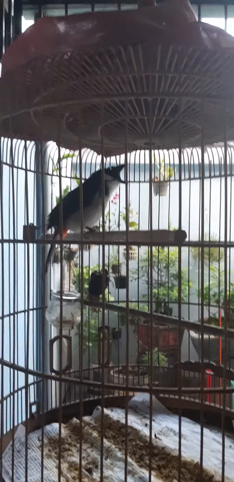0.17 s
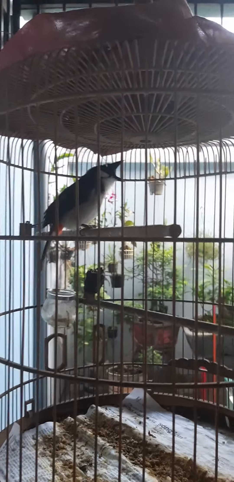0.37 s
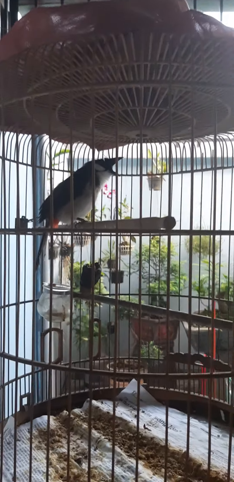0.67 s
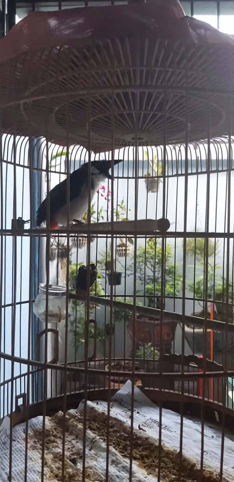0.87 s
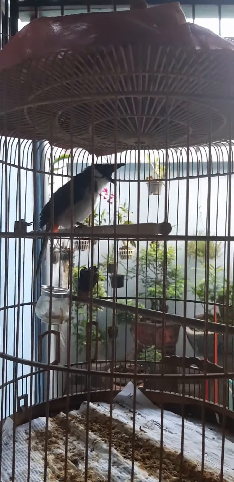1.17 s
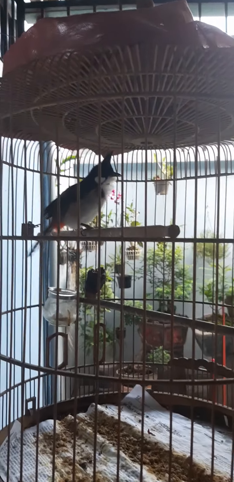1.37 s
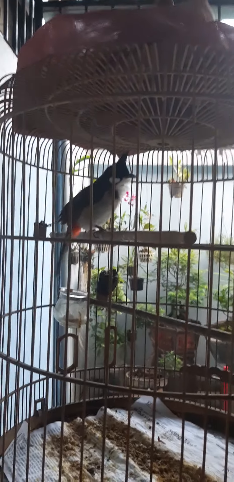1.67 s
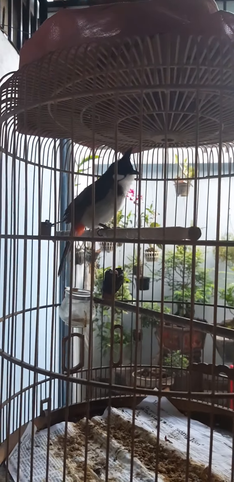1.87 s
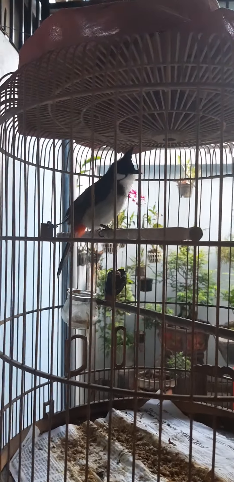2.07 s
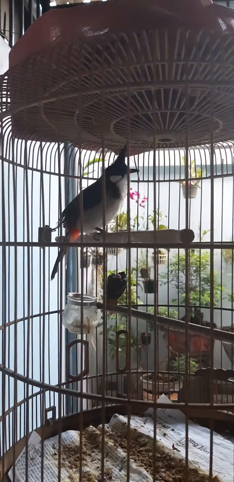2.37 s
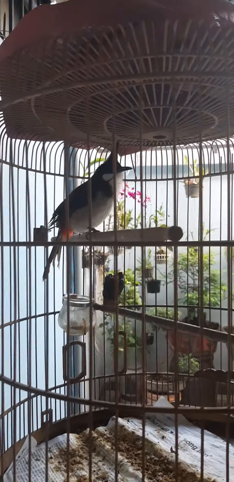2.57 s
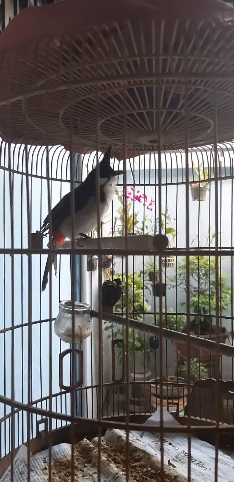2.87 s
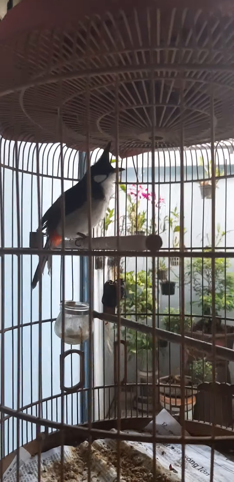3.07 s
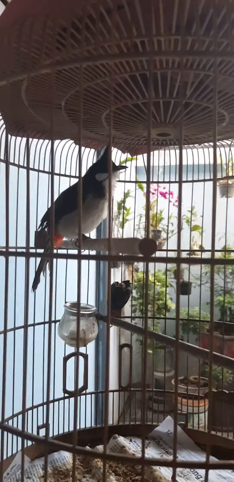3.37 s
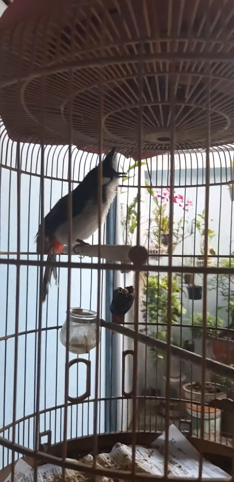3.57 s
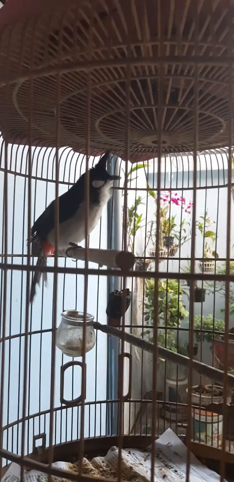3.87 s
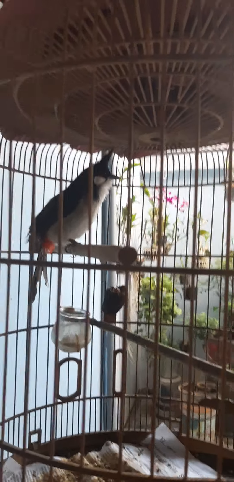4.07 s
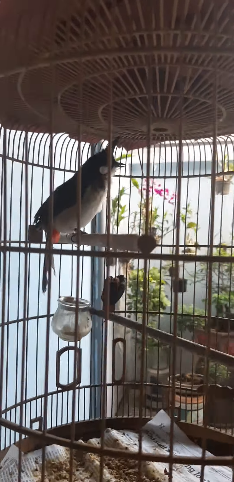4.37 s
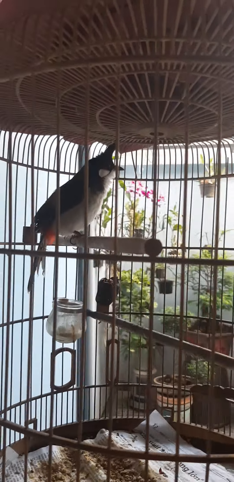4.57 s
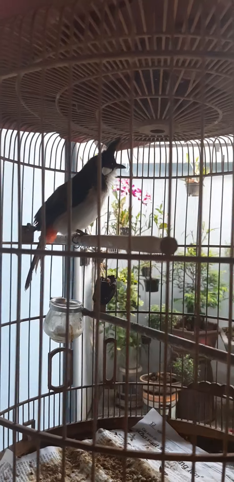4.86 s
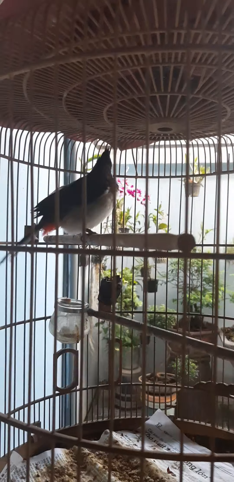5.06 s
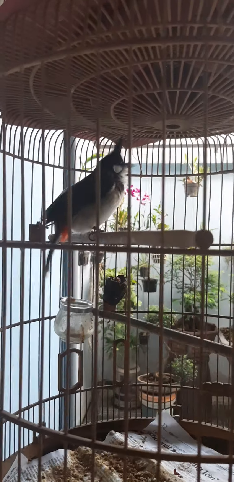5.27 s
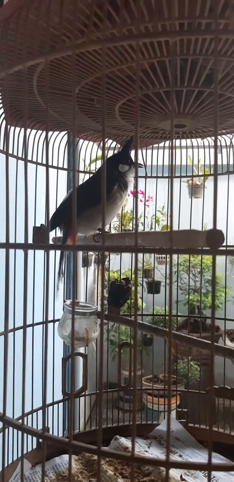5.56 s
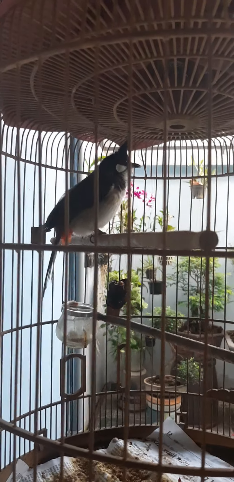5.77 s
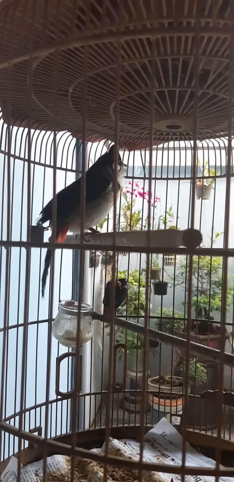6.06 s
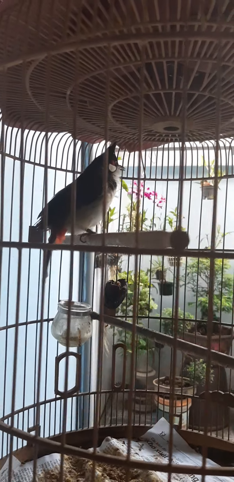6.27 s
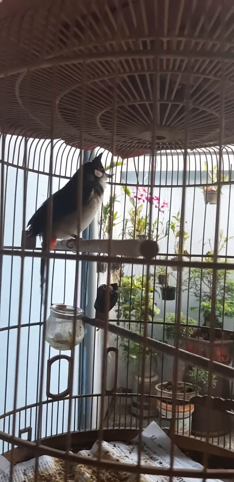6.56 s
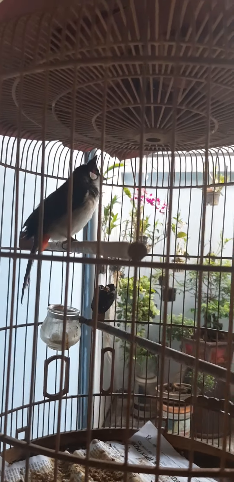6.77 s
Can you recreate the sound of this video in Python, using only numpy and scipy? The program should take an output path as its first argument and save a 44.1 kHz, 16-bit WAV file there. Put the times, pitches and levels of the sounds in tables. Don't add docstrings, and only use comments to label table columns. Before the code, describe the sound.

Close crested bird sings quick chip-and-warble phrases, ending in a run of bright whistles, with soft cage rustles and distant town rumble behind.

```python
import sys
import numpy as np
from scipy import signal
from scipy.fft import rfft, irfft, next_fast_len
from scipy.io import wavfile
from scipy.ndimage import uniform_filter1d, map_coordinates

SR = 44100
rng = np.random.default_rng(int(sys.argv[2]) if len(sys.argv) > 2 else 0)


def field_ratio(decibels):
    return 10 ** (np.asarray(decibels, dtype=float) / 20)


def store_wav(level_fs):
    pcm = np.round(np.clip(np.atleast_2d(level_fs), -1, 1) * 32767)
    wavfile.write(sys.argv[1], SR, pcm.T.astype(np.int16))


N = 305613
TIME = np.arange(N) / SR


def unit(x):
    return x / np.sqrt(np.mean(x ** 2) + 1e-20)


def along(points, hz):
    f, v = np.transpose(points)
    return np.interp(np.log(hz + 1), np.log(f + 1), v)


def level_over_time(points, outside_db=None):
    return np.interp(TIME, *np.transpose(points), left=outside_db, right=outside_db)


def wobble(rate):
    return map_coordinates(rng.standard_normal(N // 20), [TIME * rate])


def filtered(x, response):
    m = next_fast_len(N + 8192)
    return irfft(rfft(x, m) * response(np.fft.rfftfreq(m, 1 / SR)), m)[..., :N]


def swell(start, length, rise, fall):
    u = TIME - start
    return np.clip(u / rise, 0, 1) * np.exp(-np.clip(u - length, 0, None) / fall)


# frequency in Hz, likeness from -1 to 1.
PORT_LIKENESS = [(60, 1), (130, 0.98), (290, 0.89), (640, 0.61), (1400, 0.087), (3000, 0.15),
                 (15000, -0.11)]


def ports(pair, gain):
    turn = lambda hz: np.arccos(np.clip(along(PORT_LIKENESS, hz), -1, 1)) / 2
    mid, side = filtered(pair, lambda hz: gain(hz) * [np.cos(turn(hz)), np.sin(turn(hz))])
    return np.array([mid + side, mid - side])


def diffuse(gain):
    return unit(ports(rng.standard_normal((2, N)), gain))


# frequency in Hz, level in dB per Hz.
TRAFFIC_COLOUR = [(24, -37), (40, -30), (64, -19), (92, -7), (169, -4.5), (330, -4.5), (389, -9),
                  (429, -10.5), (1260, -18), (2000, -41), (2600, -83), (4400, -120)]
# time in seconds, level in dB.
TRAFFIC_SWELL = [(0, -55), (2.5, -52), (3.6, -54), (4.6, -54), (5.3, -54), (6.5, -54.5), (6.93, -55.5)]


def traffic():
    level_db = level_over_time(TRAFFIC_SWELL) + 1.5 + 1.2 * wobble(3) + .6 * wobble(10)
    return field_ratio(level_db) * diffuse(lambda f: field_ratio(along(TRAFFIC_COLOUR, f)))


# frequency in Hz, width in Hz, level in dB.
MOTOR_TONES = [(50.7, 11, -70), (101.4, 18.5, -54.5), (132.6, 7.1, -62), (436.7, 6.1, -63.5),
               (558, 21, -70.5), (1110, 12, -70.5)]


def motor_hum():
    return sum(field_ratio(db) * diffuse(lambda f: 1 / (1 + ((f - hz) / width * 2) ** 4))
               for hz, width, db in MOTOR_TONES)


# frequency in Hz, level in dB per Hz.
LEAF_COLOUR = [(700, -54), (1500, 10.5), (3000, 3.5), (4300, 1), (5600, -3.5), (7800, -1.5), (9300, -7),
               (12000, -3), (14500, -8.5), (15700, -26.5)]
# time in seconds, level in dB.
BREEZE = [(0, -57), (1.6, -58), (2.4, -57.5), (3.1, -61), (4.7, -61.5), (5.6, -53.5), (6.93, -64)]


def leaves():
    level_db = level_over_time(BREEZE) + 0.9 * wobble(20)
    return field_ratio(level_db) * diffuse(lambda f: field_ratio(along(LEAF_COLOUR, f)))


# time in seconds, level in dB.
HORN_LEVEL = [(4.5, -80), (4.62, -63), (4.86, -77), (4.88, -60.5), (5.17, -59), (5.24, -59.5), (5.4, -80)]
# multiple of the base pitch, level in dB.
HORN_OVERTONES = [(1, -7), (6, -9.5), (7, 3), (8, -3), (9, -10), (10, -15.5)]


def horn(hz=432):
    level = field_ratio(level_over_time(HORN_LEVEL, outside_db=-120))
    return level * sum(field_ratio(db) * diffuse(lambda f: 1 / (1 + ((f - k * hz) / 16) ** 2))
                       for k, db in HORN_OVERTONES)


# frequency in Hz, width in Hz, level in dB.
METAL_RINGS = [(1025, 130, -3), (1720, 490, -6.5), (2610, 54, -4), (3150, 48, -8.5), (3206, 22, 0.5),
               (4070, 55, -8.5)]
# time in seconds, level in dB.
SCRAPE_LEVEL = [(2.47, -82), (2.51, -51.5), (2.65, -48.5), (2.76, -54.5), (2.86, -57)]


def scrape():
    level = field_ratio(level_over_time(SCRAPE_LEVEL, outside_db=-120))
    ringing = lambda f: sum(field_ratio(db) / (1 + ((f - hz) / width * 2) ** 2) for hz, width, db in METAL_RINGS)
    return level * diffuse(ringing)


# start in seconds, length in seconds, level in dB.
CRICKET_PIPES = [(-.1, 0.2, -55), (0.394, 0.24, -51), (0.984, 0.27, -58), (1.573, 0.19, -64),
                 (2.176, 0.15, -57), (2.767, 0.096, -62), (3.388, 0.12, -65)]


def cricket(hz=3920, flutter_db=2, width=35):
    gate = sum(field_ratio(db) * swell(s, length, rise=0.029, fall=0.062) for s, length, db in CRICKET_PIPES)
    return gate * field_ratio(flutter_db * wobble(50)) * diffuse(lambda f: 1 / (1 + ((f - hz) / width) ** 2))


# start in seconds, length in seconds, level in dB, centre in Hz.
RUSTLES = [
    (0.273, 0.56, -60, 6870),
    (2.034, .1, -60, 12130),
    (2.505, 0.48, -55, 2700),
    (3.258, 0.033, -64, 7000),
    (3.766, 0.5, -59.5, 7060),
    (4.76, 0.18, -55.5, 3100),
    (4.95, 0.047, -59, 7060),
]


def feathers(octaves=1.42):
    out = np.zeros((2, N))
    for s, length, db, hz in RUSTLES:
        brush = diffuse(lambda f: np.exp(-(np.log2((f + 1) / hz) / octaves) ** 2))
        out += field_ratio(db + 1.5 * wobble(90)) * swell(s, length * .4, rise=.008, fall=length * .5) * brush
    return out


# start in seconds, level in dB, pitch in Hz.
PERCH_KNOCKS = [
    (4.779, -36, 236),
    (4.889, -61, 200),
]


def perch():
    return sum(field_ratio(db) * swell(s, 0, rise=0.00052, fall=0.0055) * np.sin(2 * np.pi * hz * (s - TIME))
               for s, db, hz in PERCH_KNOCKS)


# start in seconds, pitch in Hz, level in dB, time to fall 60 dB in seconds.
WIRE_TICKS = [
    (.54, 13600, -50, 0.27),
    (2.042, 12800, -53, .3),
    (4.78, 12900, -56, .2),
    (4.799, 8640, -57, 0.38),
]


def cage_wires():
    return sum(field_ratio(db) * swell(s, 0, rise=.001, fall=t60 / np.log(1000))
               * np.sin(2 * np.pi * hz * TIME + [[0], [2]]) for s, hz, db, t60 in WIRE_TICKS)


# frequency in Hz, level in dB.
THROAT_COLOUR = [(800, -4.5), (1250, -9.5), (1700, -5.5), (2300, -6), (2900, -2.5), (3700, -9), (5400, -25),
                 (6500, -25), (8000, -10), (9500, -41.5), (11200, -8), (13300, -11.5), (15500, -25)]
# frequency in Hz, level in dB per Hz.
BREATH_COLOUR = [(1000, -62), (3000, -10), (6000, 6.5), (8000, -37), (9500, -5.5), (11200, 6.5),
                 (13300, 6.5), (15000, -40)]


def voice(notes, slope_db, over_db, half_db, breath_db, tuned, shake, edge, trill_hz=210):
    out, effort, jitter = np.zeros(N), np.zeros(N), wobble(440)
    beat = 2 * np.pi * np.cumsum(trill_hz * (1 + 0.1529 * wobble(60))) / SR
    order = np.arange(2, 25)[:, None] / 2
    source_db = slope_db * np.log2(order) + over_db * (order > 1) + half_db * (order % 1 > 0)
    for note in notes:
        s, hz, db, *trill = np.transpose(note)
        span = slice(round(s[0] * SR), round(s[-1] * SR))
        t = TIME[span]
        depth = np.clip(np.interp(t, s, trill[0]), 0, 1) if trill else 0
        pitch = uniform_filter1d(np.interp(t, s, hz), size=170, mode="nearest")
        drop_hz_per_s = -np.gradient(pitch) * SR
        slack = np.clip(drop_hz_per_s / 15000, 0, 1) * np.clip((1500 - pitch) / 250, 0, 1)
        pitch *= 1 + shake * jitter[span] + .1 * depth * np.cos(beat[span])
        gain = field_ratio(source_db + along(THROAT_COLOUR, order * pitch)) * (order * pitch < 16000)
        gain[[0, 2]] *= field_ratio(np.outer([-11, 7], slack))
        gain /= np.hypot(gain[0], gain[2]) ** tuned
        fade = np.clip(np.minimum(t - t[0], 2 * (t[-1] - t)) / edge, 0, 1)
        level = field_ratio(np.interp(t, s, db)) * fade
        effort[span] += level
        tone = (gain * np.sin(order * 2 * np.pi * np.cumsum(pitch) / SR)).sum(axis=0)
        out[span] += level * (1 + depth * np.sin(beat[span])) * tone
    breath = unit(filtered(rng.standard_normal(N), lambda f: field_ratio(along(BREATH_COLOUR, f))))
    return out + field_ratio(breath_db) * effort * breath


def arch(s, length, start_hz, top_hz, db, fall=0.01725, swell_db=3, end_hz=955):
    u = np.linspace(0, length, num=11)
    crest = length - fall
    rising = u < crest
    away = np.where(rising, 1 - u / crest, (u - crest) / fall) ** 2
    hz = top_hz - away * np.where(rising, top_hz - start_hz, top_hz - end_hz)
    return np.transpose([s + u, hz, db + swell_db * (u / length - (2 * u / length - 1) ** 4)])


def slide(s, length, from_hz, to_hz, db, swell_db=0., depth=0., bend=1.6):
    u = np.linspace(0, 1, num=12)
    hz = to_hz + (from_hz - to_hz) * (1 - u) ** bend
    return np.transpose([s + u * length, hz, db + swell_db * u, depth + 0 * u])


def held(s, length, from_hz, to_hz, db, settle_s=0.00304, fade_db=-3.5):
    u = np.linspace(0, length, num=40)
    hz = to_hz + (from_hz - to_hz) * np.exp(-u / settle_s)
    return np.transpose([s + u, hz, db + fade_db * u / length])


def warble(s, crest_hz, crest_db, db, length, step_hz, low_hz):
    scoop_s = .024
    at = lambda share: s + share * length
    return [(s - scoop_s, .82 * crest_hz, crest_db - 10), (s - 0.56 * scoop_s, .96 * crest_hz, crest_db),
            (s, crest_hz, crest_db),
            (at(0.082), 0.94 * step_hz, db), (at(0.3), step_hz, db),
            (at(.43), .98 * low_hz, db - 0.5), (at(.8), low_hz, db - 7),
            (at(.95), 1180, db - 1), (at(0.94), 960, db - 23)]


# start in seconds, length in seconds, start pitch in Hz, top pitch in Hz, level in dB.
CHIP_NOTES = [(.006, 0.036, 1112, 1372, -32), (0.041, 0.044, 1208, 1472, -33),
              (.424, 0.027, 1113, 1274, -26.5), (0.46, 0.036, 1051, 1343, -29.5),
              (0.506, 0.032, 1110, 1255, -32), (0.767, 0.033, 1196, 1300, -27.5),
              (2.855, 0.0247, 1086, 1212, -28), (2.888, 0.04, 955, 1408, -29),
              (2.932, 0.038, 1006, 1396, -29.5), (3.47, 0.032, 1123, 1176, -29),
              (5.221, 0.03, 1090, 1180, -29.5), (5.261, 0.043, 1148, 1444, -30.5),
              (5.301, 0.042, 1272, 1502, -29.5), (5.493, 0.033, 1270, 1242, -27),
              (5.537, .036, 1297, 1488, -25), (5.58, 0.039, 1453, 1582, -28)]
REEDY_VOICE = dict(slope_db=-19, over_db=11, half_db=-22, shake=.022, edge=.007)


def chips():
    return voice([arch(*chip) for chip in CHIP_NOTES], breath_db=-36.5, tuned=0.024, **REEDY_VOICE)


# start in seconds, length in seconds, from Hz, to Hz, level in dB.
LEAD_INS = [(0.798, 0.031, 1212, 1483, -34.5), (1.299, 0.06, 1038, 1730, -36),
            (1.667, 0.044, 1180, 1460, -39.5), (3.505, 0.015, 1307, 1690, -31),
            (3.92, 0.045, 1177, 1656, -37.5), (4.324, .04, 1110, 1638, -35.5)]
# time in seconds, pitch in Hz, level in dB, level of the steps down in dB.
WARBLE_CRESTS = [(.848, 1780, -25, -25), (1.377, 2290, -14, -22), (1.733, 2130, -26.5, -27.5),
                 (3.544, 2164, -21.5, -22), (3.983, 2262, -19.5, -23), (4.385, 2203, -20.5, -24)]
# length in seconds, middle step in Hz, low step in Hz.
WARBLE_STEPS = [(.084, 1790, 1540), (.095, 1870, 1650), (.105, 1830, 1580), (.082, 2010, 1720),
                (.104, 1890, 1510), (.098, 1850, 1520)]
FLUTY_VOICE = dict(slope_db=-6.5, half_db=-23, shake=.007)


def warbles():
    calls = [slide(*lead, swell_db=12, bend=1.15) for lead in LEAD_INS]
    calls += [warble(*crest, *steps) for crest, steps in zip(WARBLE_CRESTS, WARBLE_STEPS)]
    return voice(calls, over_db=-8.5, breath_db=-30, tuned=0.65, edge=0.0017, **FLUTY_VOICE)


# start in seconds, length in seconds, from Hz, to Hz, level in dB.
HELD_WHISTLES = [(6.133, .018, 2910, 3150, -2.5), (6.155, .018, 3110, 3150, -16),
                 (6.269, .038, 3550, 2648, -13), (6.321, .05, 2617, 2659, -22),
                 (6.499, 0.025, 2616, 2002, -17.5)]
# start in seconds, length in seconds, from Hz, to Hz, level in dB.
GLIDES = [(5.903, 0.013, 1793, 1910, -20.5), (6.067, .013, 1440, 1585, -27),
          (6.079, 0.026, 2230, 1920, -18), (6.409, 0.009, 3450, 2510, -12),
          (6.477, 0.0081, 2520, 3320, -18.5), (6.486, 0.013, 3270, 2330, -23),
          (6.536, 0.022, 1350, 1580, -27.5), (6.551, 0.031, 1980, 1615, -18.5),
          (6.578, 0.041, 1607, 1515, -21.5)]
# start in seconds, length in seconds, from Hz, to Hz, level in dB.
TRILLED_GLIDES = [(5.843, .03, 3280, 2218, -20.5), (5.871, .032, 2245, 1841, -18.5),
                  (6.103, 0.0277, 2170, 2830, -14.5), (6.354, 0.009, 2000, 1830, -28),
                  (6.367, 0.034, 2222, 2045, -18.5), (6.419, 0.0126, 3790, 2580, -14.5),
                  (6.434, 0.052, 2680, 2460, -40)]


def closing_phrase():
    whistles = [held(*row) for row in HELD_WHISTLES] + [slide(*row) for row in GLIDES]
    pure = voice(whistles, slope_db=-6.5, over_db=-13.5, half_db=-10, breath_db=-32.5,
                 tuned=0.54, shake=0.006, edge=0.0026)
    trills = voice([slide(*row, depth=0.68) for row in TRILLED_GLIDES], slope_db=-13, over_db=-2.5,
                   half_db=-12.5, breath_db=-28, tuned=0.57, shake=0.0014, edge=0.0044)
    return pure + trills


def bird():
    song = field_ratio(7.0) * chips() + field_ratio(3.0) * warbles() + closing_phrase()
    return song * field_ratio(2.82 * wobble(160))


# delay in seconds, left level in dB, right level in dB.
WALL_ECHOES = [(.013, -22, -21), (.021, -19, -20), (.033, -18, -17), (.048, -18, -19), (.074, -17, -18),
               (.092, -20, -19)]
# frequency in Hz, time to fall 60 dB in seconds.
YARD_RING = [(900, 0.65), (2000, 0.52), (4000, 0.37), (12000, 0.15)]
# frequency in Hz, level in dB.
WALL_COLOUR = [(800, -12), (1300, -9), (2000, 0), (3200, 0), (5000, -2), (12000, -2)]


def courtyard(x, wet_db=-9.3, lead=.00045, body=.55, same_side=.58):
    hz, t, z = signal.stft(rng.standard_normal((2, SR * 3 // 4)), SR, nperseg=256)
    tail = signal.istft(z * field_ratio(-60 * t / along(YARD_RING, hz)[:, None]), SR, nperseg=256)[1]
    tail *= np.clip(np.arange(tail.shape[1]) / SR / .03, 0, 1)
    left, other = signal.fftconvolve(x[None], tail / np.linalg.norm(tail[0]), axes=1)[:, :N]

    def delay(f, seconds):
        return np.exp(-2j * np.pi * f * seconds)

    def far_port(f):
        return (delay(f, lead) + body * delay(f, 1.95 * lead)) / np.hypot(1, body)

    def paths(f):
        to_left = 1 + sum(field_ratio(l) * delay(f, s) for s, l, r in WALL_ECHOES)
        to_right = 1 + sum(field_ratio(r) * delay(f, s + lead) for s, l, r in WALL_ECHOES)
        return np.array([to_left, far_port(f) * to_right])

    right = same_side * filtered(left, far_port) + np.sqrt(abs(1 - same_side ** 2)) * other
    wet = filtered(np.array([left, right]), lambda f: field_ratio(wet_db + along(WALL_COLOUR, f)))
    return filtered(x, paths) + wet


def scene():
    town = traffic() + motor_hum() + leaves() + horn() + scrape()
    cage = feathers() + perch() + cage_wires()
    return town + cricket() + cage + courtyard(bird())


def low_pass(x):
    return signal.sosfilt(signal.butter(12, 15750, fs=SR, output="sos"), x)


def record(dry):
    return low_pass(filtered(dry, lambda f: f < 15750))


dry = scene()
out = record(dry)
store_wav(out)
```